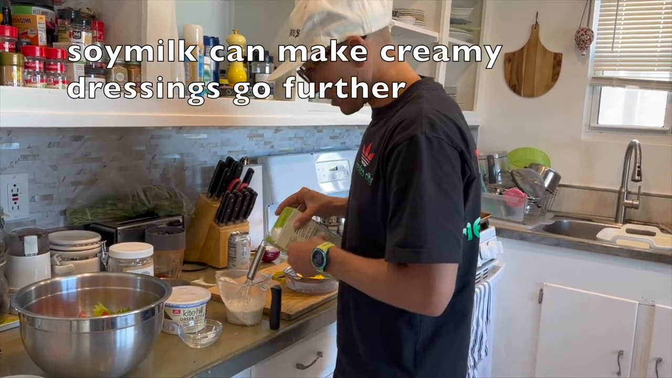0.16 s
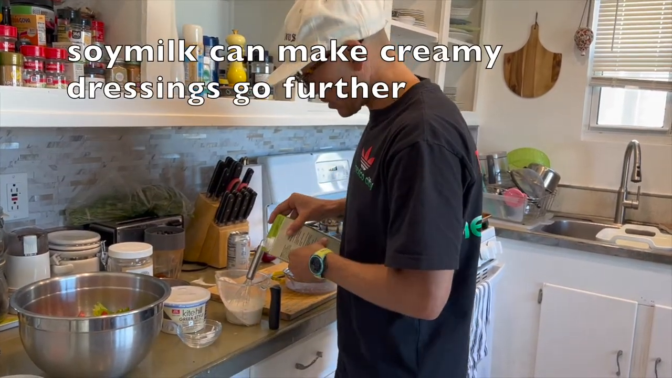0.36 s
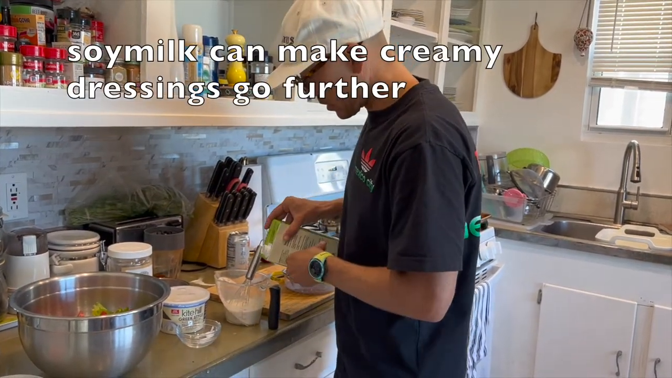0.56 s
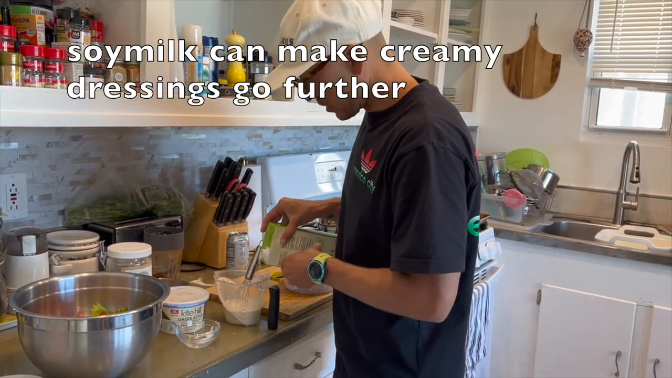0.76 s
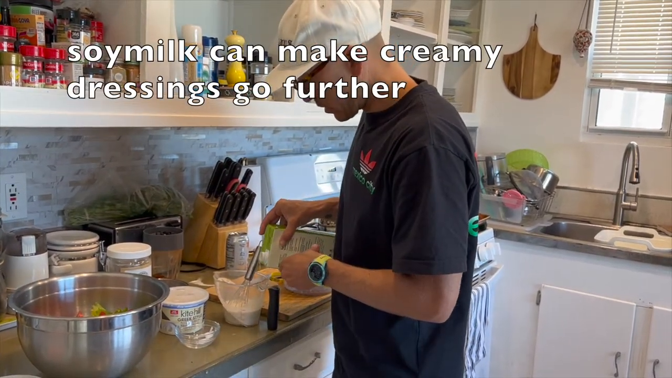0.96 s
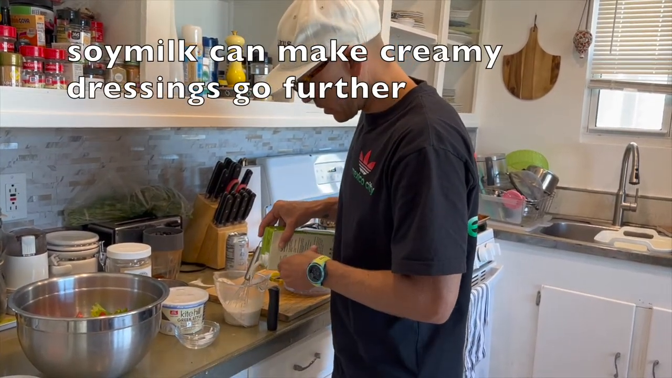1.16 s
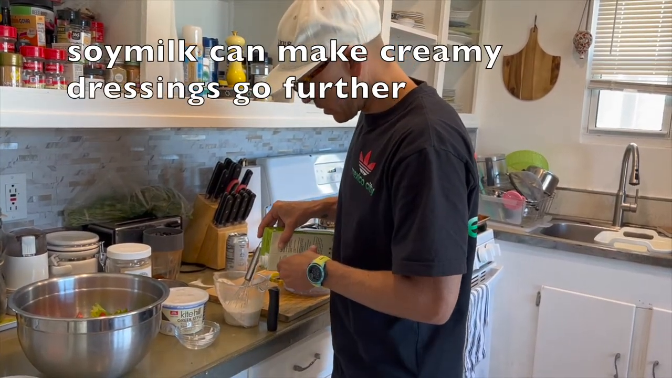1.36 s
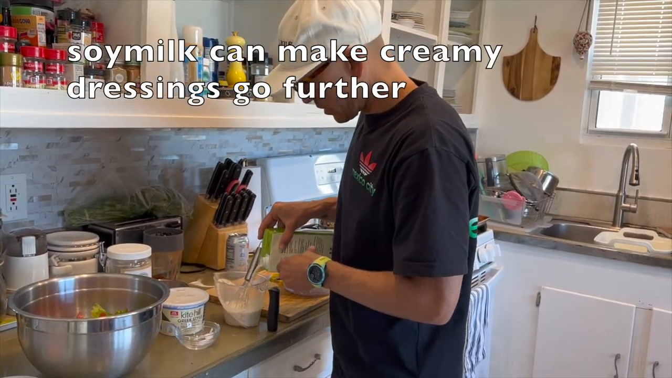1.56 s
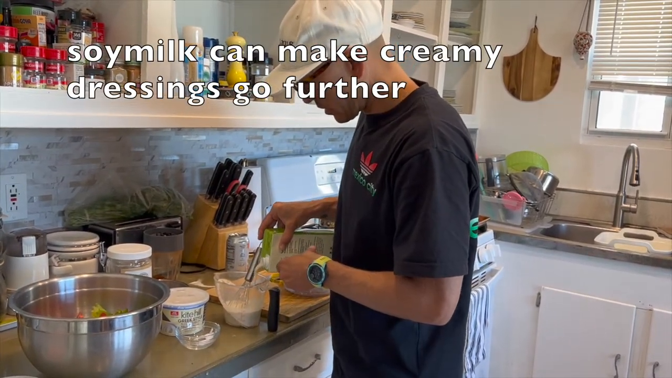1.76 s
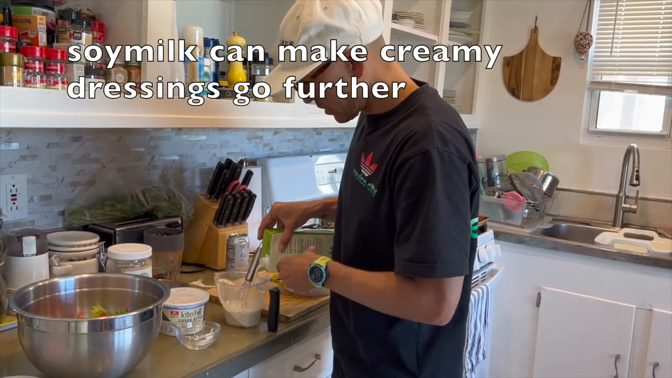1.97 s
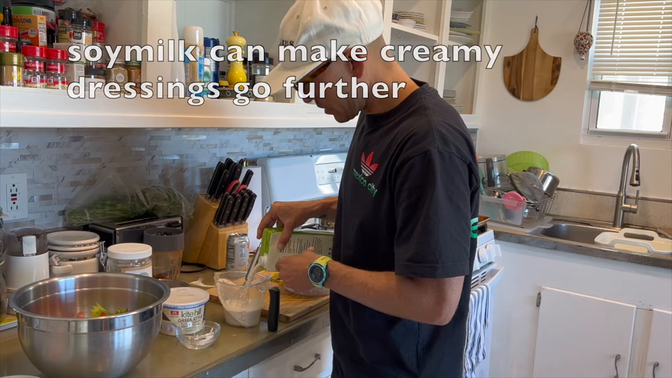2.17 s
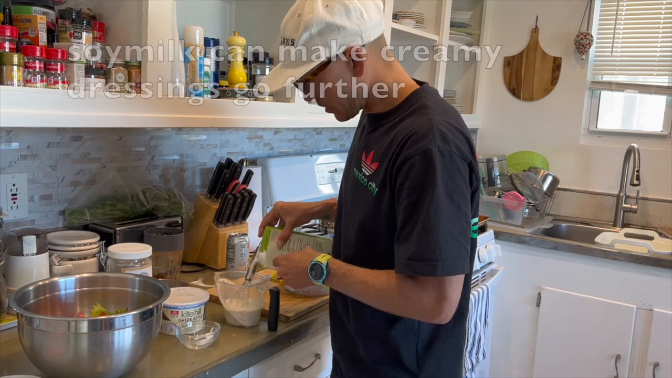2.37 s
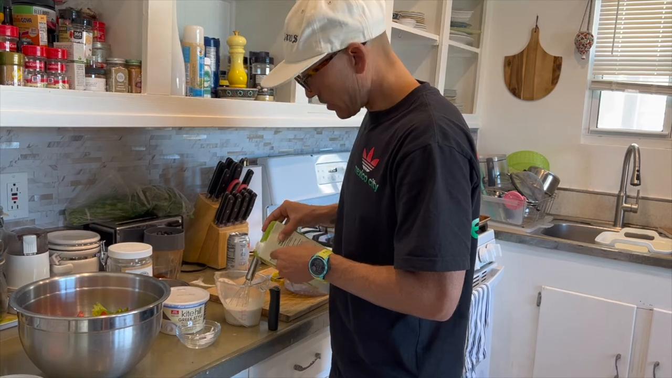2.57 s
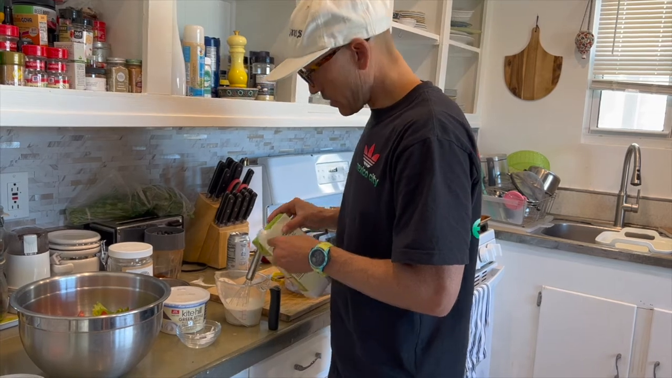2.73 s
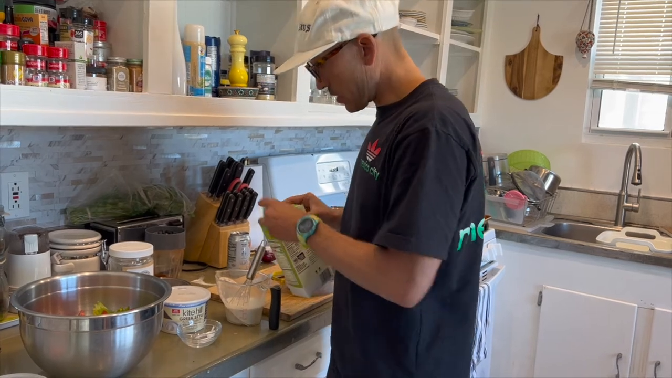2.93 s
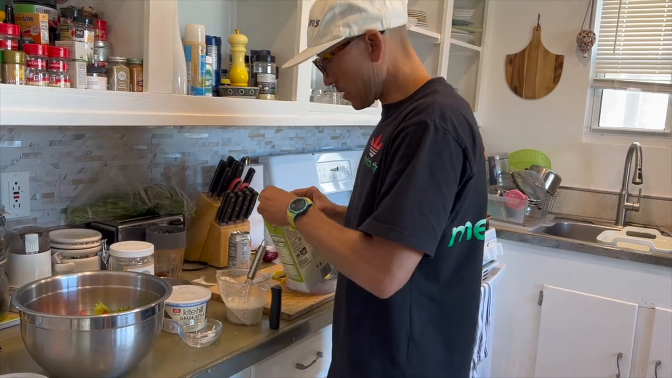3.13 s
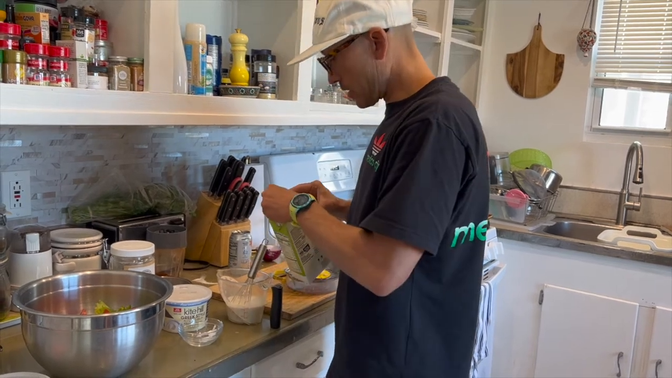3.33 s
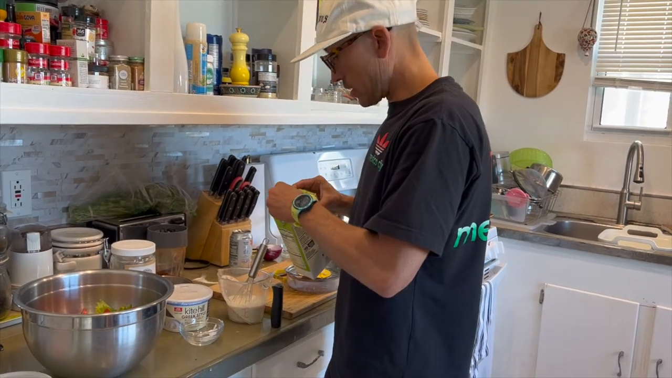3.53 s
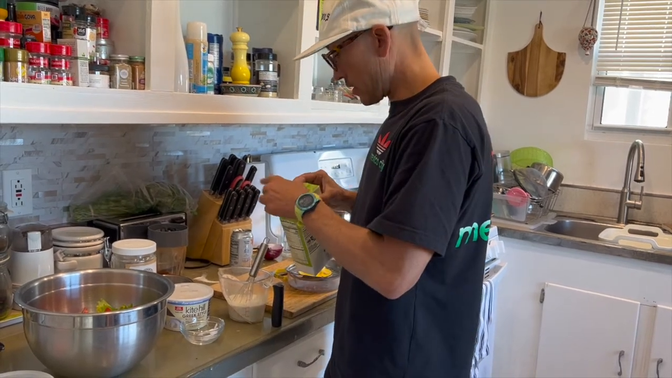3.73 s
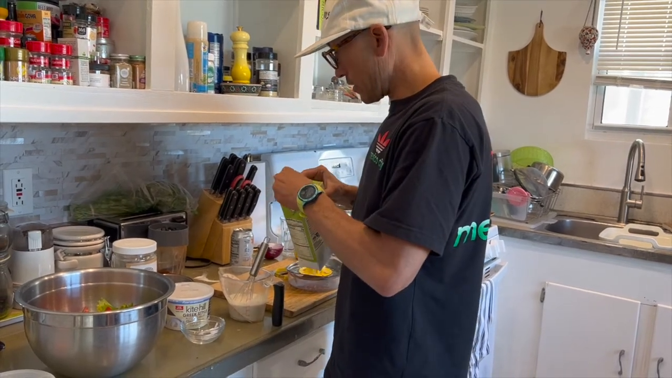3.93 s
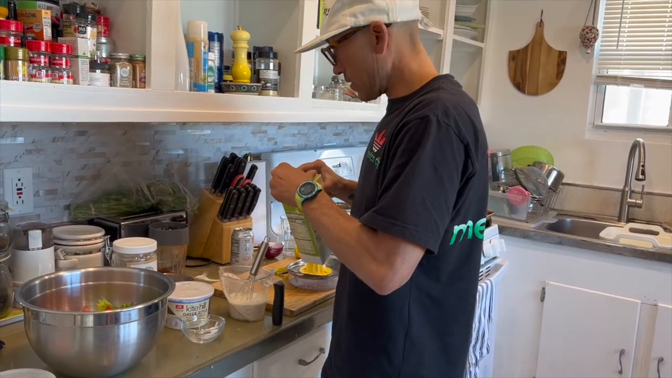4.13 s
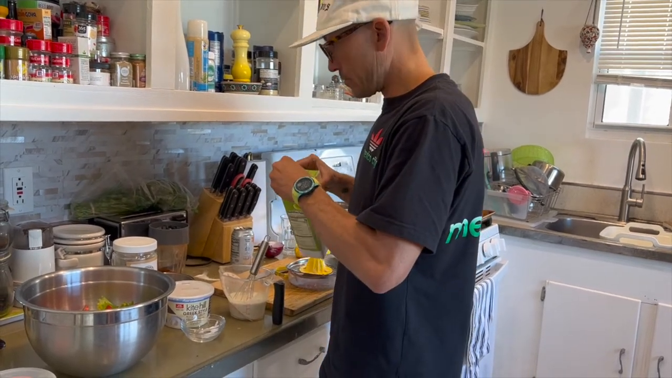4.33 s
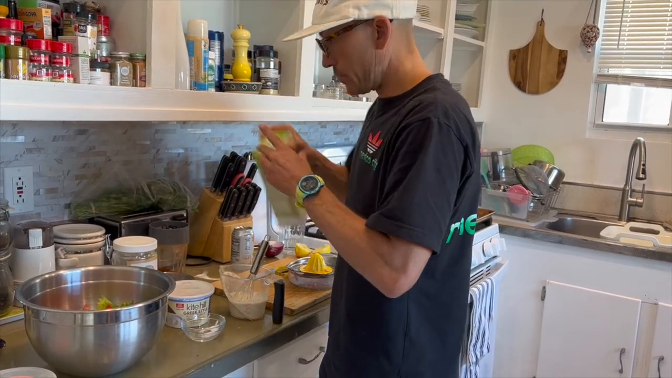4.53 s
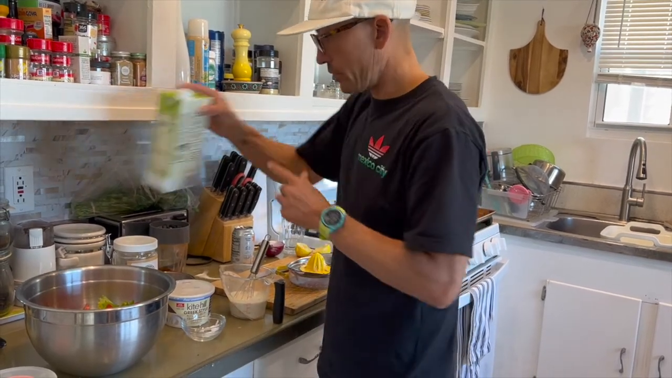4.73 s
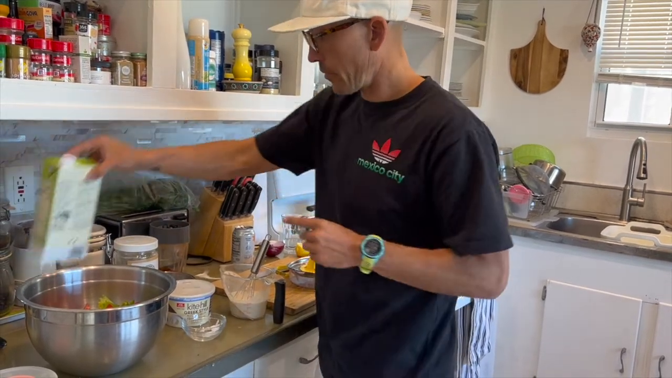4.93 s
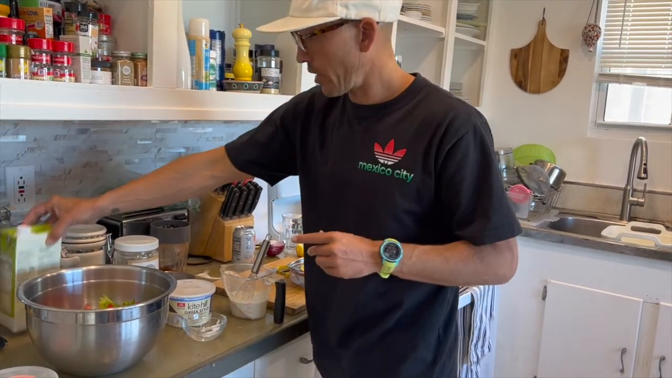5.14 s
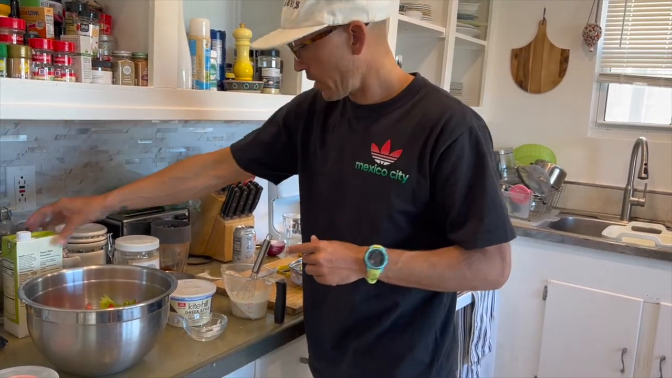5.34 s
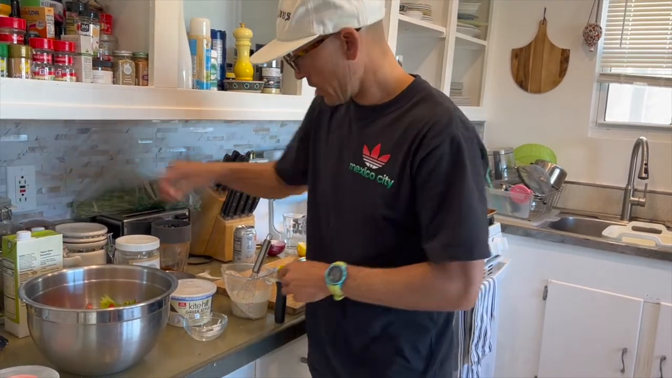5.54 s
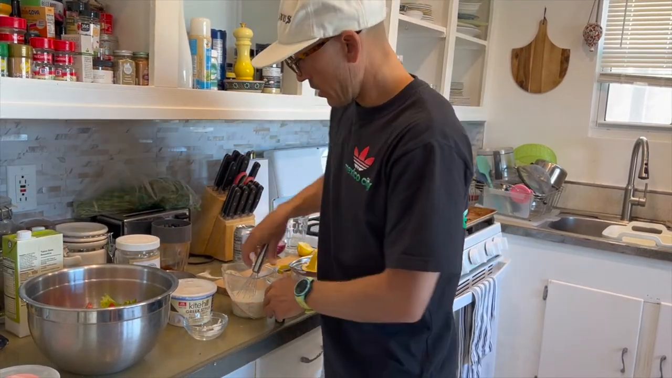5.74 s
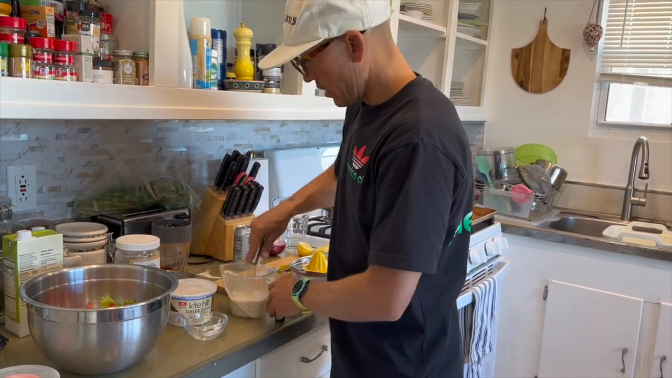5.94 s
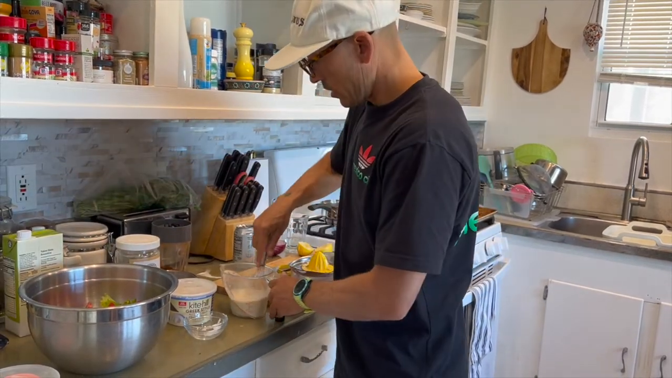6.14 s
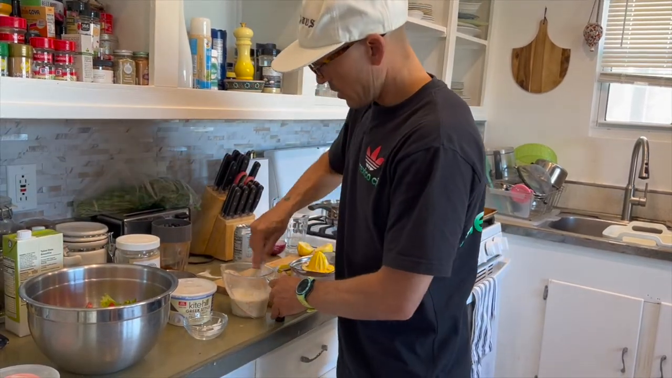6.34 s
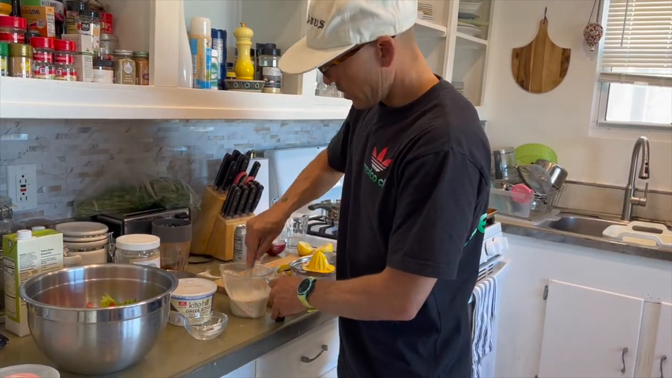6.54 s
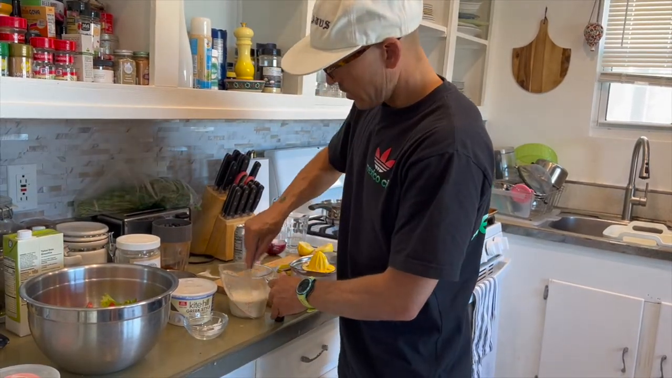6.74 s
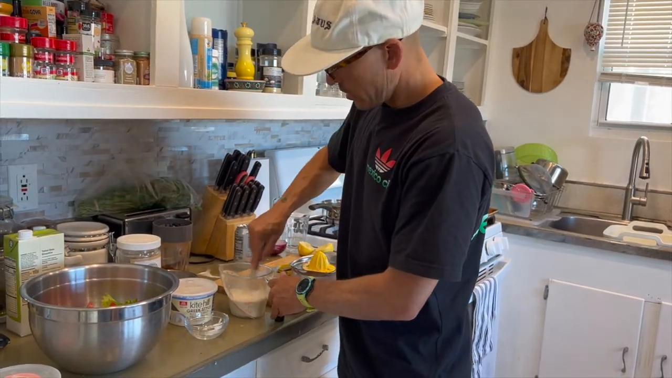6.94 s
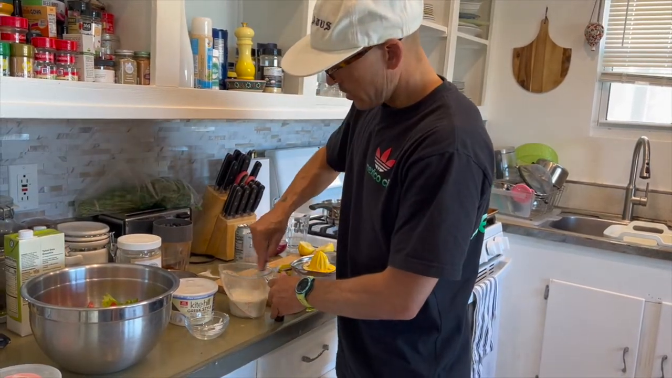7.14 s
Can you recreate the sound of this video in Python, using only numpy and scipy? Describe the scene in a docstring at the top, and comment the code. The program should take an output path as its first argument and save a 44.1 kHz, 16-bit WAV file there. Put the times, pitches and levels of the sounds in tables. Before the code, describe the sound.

Quiet handling comes first: soft rubbing, tiny spout clicks, hollow gulps with fine wet spatter. Near the middle a crisp plastic cap snap stands out, followed by a pause and a dull carton thump on the counter. The last stretch is the loudest, a wire whisk knocking and scraping a small glass bowl in fast, uneven strokes, with thick cream sloshing. The small kitchen gives short, lively reflections over low hum, rumble and faint hiss.

```python
"""Fingers rub a carton, its spout clicks, and soy milk dribbles into a small glass bowl in gulps and spatter.
The carton is capped with a sharp snap and set down with a hollow knock and a boom; a faint squeak follows.
Then a wire whisk beats the creamy dressing, about six strong strokes a second and harder as it goes: flurries
of tiny contacts ring bowl, wires and glass, and fine clicks filtered as cream churn and slosh behind them.
A small, hard-walled kitchen answers these sounds; hiss, a wandering rumble and a low hum run throughout."""
import sys
import numpy as np
from scipy import signal
from scipy.fft import rfft, irfft, next_fast_len
from scipy.io import wavfile
from scipy.ndimage import uniform_filter1d

SR = 44100
rng = np.random.default_rng(int(sys.argv[2]) if len(sys.argv) > 2 else 0)


def store_pcm(level_fs):
    """Save levels as 16-bit WAV."""
    pcm = np.round(np.clip(level_fs, -1, 1) * 32767).astype(np.int16)
    wavfile.write(sys.argv[1], SR, np.atleast_2d(pcm).T)


N = 317410

# Levels in the event tables and curves are a balance in dB; each layer adds its own trim.
# Whisk strokes. Each row: start in seconds, way of the hand, knock level in dB, pitch of the cream pocket
# in Hz, clatter on the glass in dB above the knock.
STROKES = [(5.865, "drag", -46, 890, -9), (6.005, "pull", -40.5, 1250, -9.5),
           (6.104, "pull", -36, 1190, -6), (6.173, "jab", -39, 920, -1), (6.184, "pull", -38, 890, -3),
           (6.226, "jab", -50, 1100, 4.5), (6.247, "pull", -36.5, 906, -2.5),
           (6.269, "pull", -35.5, 1030, -2), (6.341, "pull", -30, 1045, -10),
           (6.396, "pull", -31, 920, -13), (6.458, "jab", -22.5, 920, -6), (6.521, "drag", -28.5, 960, -15),
           (6.546, "pull", -36.5, 960, -1.5), (6.633, "push", -17.5, 1020, -5.5),
           (6.709, "drag", -28, 940, -3), (6.806, "push", -18, 1040, -7), (6.881, "pull", -23, 1040, -6),
           (6.977, "push", -21.5, 900, -7), (7.047, "jab", -27, 995, -4.5), (7.145, "push", -21, 1150, -4),
           (7.165, "drag", -29, 1050, -2)]
# A push ploughs through the cream into the glass, a jab hits it at once, a pull swings back more softly,
# a drag slides along the wall. Each row: early graze, wire ring and slosh in dB above the knock, sharp tick
# and scrape in dB above the clatter, fade time of the knock in seconds, its rise in seconds.
STROKE_WAYS = {"push": (-9, -11, -29, -5, -9, .005, .002), "jab": (-18, -8, -25, -1, -8, .0058, .002),
               "pull": (-20, -6, -19, -19, -5, .006, .004), "drag": (-8, -8, -20, -16, -3, .009, .012)}
# A single wire springs free and rings. Each row: start in seconds, level in dB, pitch in Hz.
WIRE_CLINKS = [(6.006, -47, 3430), (6.105, -45, 3736), (6.268, -44, 2928), (6.397, -43, 2372),
               (6.634, -29.5, 3705), (6.808, -36, 4085), (6.882, -28.5, 2385), (6.978, -34, 3709),
               (7.052, -37, 2411)]
# Milk gulps, slops and soft hollow knocks of the carton. Each row: start in seconds, level in dB, pitch in Hz.
GULPS = [(1.256, -36.5, 1200), (1.622, -52, 603), (1.903, -53.5, 1160), (1.928, -56, 1050),
         (2.244, -44.5, 520), (2.477, -46, 1290), (2.511, -44.5, 960), (3.026, -40.5, 900),
         (3.234, -42, 850), (3.259, -32.5, 950), (3.329, -36, 830), (3.387, -34.5, 860), (3.548, -47, 730),
         (3.789, -52, 950), (4.445, -66, 750)]
# Clicks of the plastic spout and cap. Each row: start in seconds, level in dB, pitch in Hz.
CLICKS = [(0.848, -50, 5400), (0.984, -53, 7760), (2.208, -51.5, 12700), (2.456, -57.5, 2450),
          (3.013, -53, 4900), (3.026, -54, 5000), (3.241, -37, 4300), (3.261, -45, 2650),
          (3.789, -53, 2900), (3.936, -43.5, 3300), (3.943, -28.5, 3170), (4.708, -61, 1900)]
# The carton lands, rocks and settles. Each row: start in seconds, boom of the counter in dB, knock of the
# carton in dB, pitch of the knock in Hz, scuff in dB.
THUMPS = [(5.176, -42, -39.5, 620, -48), (5.182, -37, -41, 280, -55), (5.203, -39, -48, 420, -60),
          (5.32, -52, -54, 400, -64)]
# Fingers slide on the carton. Each row: start in seconds, length before the fade in seconds, level in dB.
RUBS = [(0, 0.11, -74.5), (1.235, .04, -69), (1.95, 0.25, -80), (3.36, .6, -73.5), (4.337, 0.13, -83),
        (4.703, .37, -75), (5.72, .08, -81)]
# A faint squeak as the hand leaves the carton. One row: start in seconds, length in seconds, level in dB,
# first pitch in Hz, last pitch in Hz.
SQUEAK = (5.475, .13, -77, 905, 925)

# Resonances of the struck bodies. Each row: pitch in Hz, width in Hz, relative level in dB.
BOWL_MODES = [(392, 26, -14), (438, 46, -8), (684, 32, -11), (726, 30, -10), (942, 40, -2), (998, 34, -7),
              (1105, 26, -4), (1160, 70, -7), (1570, 130, -10), (2070, 130, -12)]
WIRE_MODES = [(2270, 46, -3), (2372, 66, 1), (2610, 230, -9.5)]
GLASS_MODES = [(1600, 440, -16), (2660, 1500, -6), (3770, 370, -1.5), (4300, 1500, -7.5), (5400, 420, -4.5),
               (6270, 260, -5), (8500, 470, -11), (12000, 1500, -16)]
TICK_MODES = [(6500, 2500, -6.5), (8500, 800, -3), (12200, 2200, 0.5), (14500, 1500, -7)]
CARTON_MODES = [(235, 90, -3), (445, 110, 2), (710, 95, -2), (931, 105, 2), (1100, 150, -6.5),
                (1435, 180, -7.5), (1700, 260, -13), (2650, 600, -14)]
COUNTER_MODES = [(57, 10, 2), (82, 12, 9), (119, 18, 1), (153, 22, -2), (205, 30, -2), (243, 30, 0),
                 (305, 50, -3), (410, 70, -8)]
# Colours of spatter, plastic, rubbing, cream, hiss and rumble. Each row: pitch in Hz, relative level in dB.
SPATTER_COLOUR = [(300, -29), (1500, -23), (3000, -21), (5000, 11), (8000, 5), (13000, 12.5), (16000, -13)]
PLASTIC_COLOUR = [(500, -37), (1800, 0.5), (2900, -1), (5000, 2), (8000, -6.5), (13000, -7), (16000, -8)]
RUB_COLOUR = [(150, -26), (500, -3.5), (1000, 2), (2000, 4.5), (4500, 0.5), (6500, -4.5), (9000, -5.5),
              (13000, -4), (16000, -13)]
CREAM_COLOUR = [(100, -12.5), (200, 2), (300, -2.5), (450, 4.5), (620, 1), (1000, 4.5), (1800, 1.5),
                (2400, 0.5), (5500, -3.5), (8500, -19.5), (13000, -17.5), (16000, -28)]
AIR_COLOUR = [(180, -24), (300, -6.5), (593, -10), (842, -12), (1500, -22), (2700, -23.5), (3950, -17),
              (9880, -40), (12700, -21.5), (16000, -49)]
RUMBLE_COLOUR = [(20, -27), (40, -17), (58, 3), (85, -3.5), (140, -7), (220, -10), (400, -17.5),
                 (900, -32.5), (3000, -45.5)]
# Steady churning of the cream as the hand gets going. Each row: time in seconds, level in dB.
STIRRING = [(5.55, -90), (5.83, -62), (6.12, -62), (6.3, -54), (7.2, -49.5)]
# Shared level curve of the hum and rumble. Each row: time in seconds, level in dB.
DRONE = [(0, -65.5), (3.5, -66), (4.1, -73), (5.3, -78.5), (5.85, -64.5), (7.2, -59.5)]

# Decay of the kitchen. Each row: pitch in Hz, time to fall by 60 dB in seconds.
KITCHEN_DECAY = [(80, 1.2), (260, 0.4), (800, 0.3339), (1800, 0.46), (4000, 0.4466), (8000, 0.4),
                 (14000, 0.24)]
# Left-right likeness of echoes and background. Each row: pitch in Hz, likeness from 0 to 1.
ALIKE = [(300, 0.89), (700, 0.43), (1400, 0.6), (3000, 0.44), (15000, 0.41)]
# Colour of the echoes. Each row: pitch in Hz, relative strength in dB.
ECHO_COLOUR = [(100, -4), (500, 2.5), (1000, -2), (3000, -0.5), (14000, 3)]
# Tilt between the microphones. Each row: pitch in Hz, left minus right in dB.
LEAN = [(60, 1.5), (180, 1.5), (550, 2), (1650, 0.5), (4970, 5.5), (15000, -2)]
# Phase of the right microphone port. Each row: pitch in Hz, lag in radians (negative is a lead).
PORT_LAG = [(100, 0), (1900, 0.84), (3700, 1), (6000, 1.5), (9500, -3), (12500, -6.1)]
# Response of both microphones. Each row: pitch in Hz, response in dB.
MICROPHONE = [(8300, -1.5), (9100, -9.5), (10000, -45), (11000, -10.5), (11700, -5)]

EDGE_HZ = 16000  # upper band limit
TAPS = 4096  # filter length in samples
HZ = np.fft.rfftfreq(TAPS, 1 / SR)
TIME = np.arange(N) / SR
GRAZE_LEAD_S, GRAZE_S = .011, 0.0038  # the leading wire touches this early, and fades in this time
SLOSH_S = 0.019  # the cream swells for this long after a stroke, then falls back
SCRAPE_S = .014  # rise and fade time of the wires sticking and slipping along the glass
CLINK_WIDTH_HZ = 85
GULP_S, CLICK_S = 0.0053, 0.0054  # fade times of a gulp and a click of middling strength
MIDDLING_DB, DB_PER_HALVING = -42.5, 17  # stronger ones are shorter
SPATTER_HZ, SPATTER_DB_PER_OCTAVE = 1180, 20  # higher gulps are wetter
KNOCK_HZ, KNOCK_DB_PER_OCTAVE = 2900, -7  # lower clicks shake the carton more
CLICK_OCTAVES, BLUR = 0.23, 1.3  # width of a click's ring, and how fast it widens as the snap gets shorter
RUB_ATTACK_S, RUB_RELEASE_S = 0.018, 0.083


def whisk(knock_db=-4.8, wire_db=-9, clatter_db=-4.8, graze_clatter_db=-3, tick_s=0.0029, clink_db=-2):
    """A leading wire grazes, then the rest knock bowl and cream pocket, ring, clatter and scrape on the glass."""
    out = np.zeros(N)
    for s, way, db, pocket_hz, clatter in STROKES:
        graze, wire, _, tick, scrape, length, rise = STROKE_WAYS[way]
        bowl = struck(BOWL_MODES, vary_db=3, detune=.012) + hump(pocket_hz, octaves=0.2, height_db=6)
        glass = struck(GLASS_MODES, vary_db=2.5, detune=.02)
        glass_db = db + clatter + clatter_db

        graze_knock = blow(rattle(GRAZE_S, per_s=3300), bowl, db + graze + knock_db)
        add(out, s - GRAZE_LEAD_S, graze_knock)
        graze_clatter = blow(rattle(GRAZE_S, per_s=6800), glass, glass_db + graze + graze_clatter_db)
        add(out, s - GRAZE_LEAD_S, graze_clatter)

        add(out, s, blow(rattle(length, per_s=3000, rise=rise), bowl, db + knock_db))
        wire_push = rattle(length, per_s=1600)
        wires = struck(WIRE_MODES, vary_db=4, detune=.04)
        add(out, s, blow(wire_push, wires, db + wire + wire_db))
        add(out, s, blow(rattle(1.4 * length, per_s=4000, rise=rise), glass, glass_db))
        tick_push = rattle(tick_s, per_s=2500, rise=0.00073)
        add(out, s, blow(tick_push, resonances(TICK_MODES), glass_db + tick))

        scrape_push = rattle(SCRAPE_S, per_s=320, rise=SCRAPE_S)
        scraped_glass = struck(GLASS_MODES, vary_db=4, detune=.07)
        add(out, s + length, blow(scrape_push, scraped_glass, glass_db + scrape))
    for s, db, hz in WIRE_CLINKS:
        clink_push = rattle(tick_s / 2, per_s=1600, rise=.0007)
        add(out, s, blow(clink_push, resonances([(hz, CLINK_WIDTH_HZ, 0)]), db + clink_db))
    return out


def dressing(level_db=-3):
    """Films of cream tear and small bubbles burst behind the wires: a steady churn, a slosh after each stroke."""
    level = follow(STIRRING)
    age = TIME[:SR // 2] / SLOSH_S
    for s, way, db, _, _ in STROKES:
        _, _, slosh, *_ = STROKE_WAYS[way]
        add(level, s, amp(db + slosh) * age * np.exp(1 - age))
    bursts = crackle(per_s=800, spread_db=5)
    cream = unit(ring(bursts, read(CREAM_COLOUR)))
    bowl = unit(ring(bursts, resonances(BOWL_MODES)))
    return amp(level_db) * level * unit(cream + amp(-9) * bowl)


def milk(gulp_db=-3, spatter_db=-26):
    """Each gulp or soft knock rings the hollow carton near its own pitch, with a fine spatter over it."""
    out = np.zeros(N)
    carton = resonances(CARTON_MODES)
    for s, db, hz in GULPS:
        length = contact(GULP_S, db)
        wetness = SPATTER_DB_PER_OCTAVE * np.log2(hz / SPATTER_HZ)
        hollow = carton + hump(hz, octaves=0.57, height_db=12.5)
        add(out, s, blow(rattle(length, per_s=2600), hollow, db + gulp_db))
        drops = rattle(6.1 * length, per_s=1700)
        add(out, s, blow(drops, read(SPATTER_COLOUR), db + wetness + spatter_db))
    return out


def cap(click_db=-5, knock_db=-12.5):
    """Plastic snaps with a short bright ring, purer when the click is light, and the carton under it knocks."""
    out = np.zeros(N)
    carton = resonances(CARTON_MODES) + hump(810, octaves=0.42, height_db=15.5)
    for s, db, hz in CLICKS:
        length = contact(CLICK_S, db)
        knock = KNOCK_DB_PER_OCTAVE * np.log2(hz / KNOCK_HZ)
        snap = rattle(length, per_s=5500, rise=0.00076)
        octaves = CLICK_OCTAVES * (CLICK_S / length) ** BLUR
        plastic = read(PLASTIC_COLOUR) + hump(hz, octaves, height_db=11.5)
        add(out, s, blow(snap, plastic, db + click_db))
        add(out, s, blow(snap, carton, db + knock + knock_db))
    return out


def set_down(boom_db=-3, knock_db=-4, scuff_db=-4, soft_hz=420):
    """The carton knocks hollowly, its base scuffs, and the counter booms, its treble dulled by the soft weight."""
    out = np.zeros(N)
    counter = resonances(COUNTER_MODES) - 10 * np.log10(1 + (HZ / soft_hz) ** 4)
    for s, boom, knock, hz, scuff in THUMPS:
        add(out, s, blow(rattle(.002, per_s=2000), counter, boom + boom_db))
        carton = resonances(CARTON_MODES) + hump(hz, octaves=.3, height_db=19)
        add(out, s, blow(rattle(.004, per_s=2600), carton, knock + knock_db))
        add(out, s, blow(rattle(.005, per_s=1600), read(RUB_COLOUR), scuff + scuff_db))
    return out


def hands(level_db=-1):
    """Fingers and sleeve rub softly along the carton: coloured noise that swells, holds and fades."""
    level = np.zeros(N)
    for s, length, db in RUBS:
        swell = np.clip((TIME - s) / RUB_ATTACK_S, 0, 1)
        fade = np.exp(-np.maximum(TIME - s - length, 0) / RUB_RELEASE_S)
        level += amp(db) * swell * fade
    return amp(level_db) * level * unit(ring(rng.standard_normal(N), read(RUB_COLOUR)))


def squeak():
    """A thin sine tone that swells, rises a little in pitch and fades."""
    s, length, db, first_hz, last_hz = SQUEAK
    out = np.zeros(N)
    u = np.linspace(0, 1, round(length * SR))
    turns = np.cumsum(first_hz + (last_hz - first_hz) * u) / SR
    add(out, s, amp(db) * np.sin(np.pi * np.sqrt(u)) * np.sin(2 * np.pi * turns))
    return out


def background(air_db=-76.5, rumble_db=2, hum_db=-4.5, hum_hz=58.7, wander_db=2.2):
    """Faint hiss, a low rumble that wanders in level, and the hum of an appliance as one sine."""
    noise = pair(rng.standard_normal((2, N)))
    air = unit(np.array([ring(side, read(AIR_COLOUR)) for side in noise]))
    # the same noise backwards serves as the rumble
    rumble = unit(np.array([ring(side, read(RUMBLE_COLOUR)) for side in noise[:, ::-1]]))
    slow = TIME[::SR // 200]
    sways = [np.sin(2 * np.pi * (hz * slow + rng.random())) for hz in np.geomspace(2, 14, 10)]
    wander = np.interp(TIME, slow, unit(sum(sways)))
    rumble = unit(rumble * amp(wander_db * wander))
    hum = unit(np.sin(2 * np.pi * hum_hz * TIME))
    return amp(air_db) * air + follow(DRONE) * (amp(rumble_db) * rumble + amp(hum_db) * hum)


def kitchen(x, near_db, tail_db, near_s, count):
    """The sound crossfades in turn between several random patterns of reflections."""
    size = next_fast_len(N + SR // 2, True)
    turn = TIME / .13  # the next pattern every 0.13 s
    echoes = 0
    for k in range(count):
        share = np.sqrt(np.clip(1 - abs((turn - k) % count - count / 2), 0, 1))
        pattern = np.float32(echo(near_db, tail_db, near_s))
        echoes = echoes + rfft(np.float32(share * x), size) * rfft(pattern, size)
    return x + irfft(echoes, size)[:, :N]


def echo(near_db, tail_db, near_s):
    """Quick reflections from counter and tiles, and a tail that dies band by band."""
    t = TIME[:SR // 2]
    signs = rng.choice([-1., 1.], (2, len(t)))
    taps = pair(signs * (rng.random((2, len(t))) < 6000 / SR))
    near = taps * np.exp(-t / near_s) * (t > .0012)
    hz, when, z = signal.stft(taps[:, ::-1], SR, nperseg=256)
    decay = amp(-60 * when / read(KITCHEN_DECAY, hz)[:, None])
    tail = signal.istft(z * decay, SR)[1][:, :len(t)]
    tail = tail * np.clip(t / 0.0094, 0, 1)
    near = amp(near_db) * near / np.linalg.norm(near[0])
    tail = amp(tail_db) * tail / np.linalg.norm(tail[0])
    return np.array([ring(side, read(ECHO_COLOUR)) for side in near + tail])


def rattle(length, per_s, rise=0.0039):
    """A flurry of random tiny contacts that swells and quickly dies, its spectrum partly flattened."""
    t = TIME[:TAPS]
    clicks = rng.standard_normal(TAPS) * (rng.random(TAPS) < per_s / SR)
    clicks[0] = 1
    clicks = clicks * np.exp(-t / max(length, 1e-4)) * (1 - 0.95 * np.exp(-t / rise))
    # the push holds all pitches fairly evenly, so the struck body sets most of the colour
    power = abs(rfft(clicks)) ** 2
    return ring(np.pad(clicks, (0, TAPS)), -5 * np.log10(power + power.mean() / 10))


def blow(push, response_db, db):
    """A body rung by a push; db is the level of its loudest hundredth of a second."""
    sound = ring(push, response_db)
    loudest = uniform_filter1d(sound ** 2, size=441, mode="constant").max()
    return amp(db) * sound / np.sqrt(loudest)


def contact(length, db):
    """How long a contact lasts: a firm one is over sooner than a soft one."""
    return length * 2 ** ((MIDDLING_DB - db) / DB_PER_HALVING)


def struck(modes, vary_db, detune):
    """Every hit lands elsewhere: it favours other modes and shifts their pitch a little."""
    hz, width, db = np.transpose(modes)
    louder, higher = rng.standard_normal((2, len(modes)))
    return resonances(zip(hz * (1 + detune * higher), width, db + vary_db * louder))


def resonances(modes):
    """The dB response of band-pass resonances side by side, their powers summed."""
    f = HZ + 1
    power = 0
    for hz, width, db in modes:
        power = power + amp(db) ** 2 / (1 + ((f * f - hz * hz) / (f * width)) ** 2)
    return 10 * np.log10(power)


def hump(hz, octaves, height_db):
    """A smooth rise of the spectrum around one pitch."""
    return height_db * np.exp(-.5 * (np.log2((HZ + 1) / hz) / octaves) ** 2)


def ring(x, response_db):
    """Passes x through a causal, minimum-phase body with this response."""
    cepstrum = irfft(np.log(amp(response_db) + 1e-6))
    # folding the cepstrum forward puts the energy as early as it can be
    cepstrum[1:TAPS // 2] *= 2
    cepstrum[TAPS // 2 + 1:] = 0
    return signal.oaconvolve(x, irfft(np.exp(rfft(cepstrum))))[:len(x)]


def crackle(per_s, spread_db):
    """Tiny clicks from start to end, a few much larger than the rest."""
    size, sign, place = rng.random((round(per_s * N / SR), 3)).T
    gain = amp(spread_db * np.minimum(-np.log(1 - size), 4)) * np.sign(sign - .5)
    return np.bincount((place * N).astype(int), gain, N)


def pair(two):
    """Makes two unrelated signals partly alike, most of all in the bass, as at two close microphones."""
    size = next_fast_len(two.shape[1], True)
    z = rfft(two, size)
    alike = np.clip(read(ALIKE, np.fft.rfftfreq(size, 1 / SR)), -1, 1)
    right = alike * z[0] + np.sqrt(1 - alike ** 2) * z[1]
    return irfft(np.array([z[0], right]), size)[:, :two.shape[1]]


def amp(db):
    """Decibels to gain."""
    return 10 ** (np.asarray(db) / 20)


def unit(x):
    """Scales to an rms of one."""
    return x / np.sqrt(np.mean(x ** 2) + 1e-20)


def read(points, hz=HZ):
    """Reads a table on a log-frequency axis."""
    f, value = np.transpose(points)
    return np.interp(np.log(hz + 1), np.log(f + 1), value)


def follow(curve):
    """The gain of a level curve at every sample."""
    return amp(np.interp(TIME, *np.transpose(curve)))


def add(mix, s, sound):
    """Mixes a sound in at time s."""
    part = mix[round(s * SR):][:len(sound)]
    part += sound[:len(part)]


def scene():
    """Bowl, milk and carton each get their own kitchen echoes, over a background without any."""
    bowl = kitchen(whisk() + dressing(), near_db=-0.5, tail_db=-3.5, near_s=0.014, count=4)
    liquid = kitchen(milk(), near_db=0, tail_db=-1, near_s=0.022, count=2)
    carton_sounds = cap() + set_down() + hands() + squeak()
    carton = kitchen(carton_sounds, near_db=0.5, tail_db=-0.5, near_s=0.02, count=2)
    return bowl + liquid + carton + background()


def record(dry):
    """Two microphones differ in level and phase by pitch; both are weaker near 10 kHz; then the band limit."""
    left = ring(dry[0], read(MICROPHONE) + read(LEAN) / 2)
    right = ring(dry[1], read(MICROPHONE) - read(LEAN) / 2)
    size = next_fast_len(N + TAPS, True)
    lag = read(PORT_LAG, np.fft.rfftfreq(size, 1 / SR))
    right = irfft(rfft(right, size) * np.exp(-1j * lag), size)[:N]
    low_pass = signal.firwin(401, EDGE_HZ, window=("kaiser", 8), fs=SR)
    return signal.oaconvolve(np.array([left, right]), low_pass[None], "same", axes=1)


dry = scene()
out = record(dry)
store_pcm(out)
```